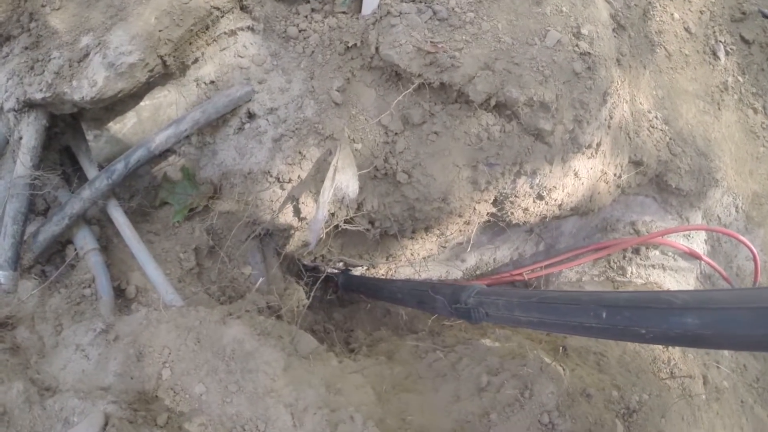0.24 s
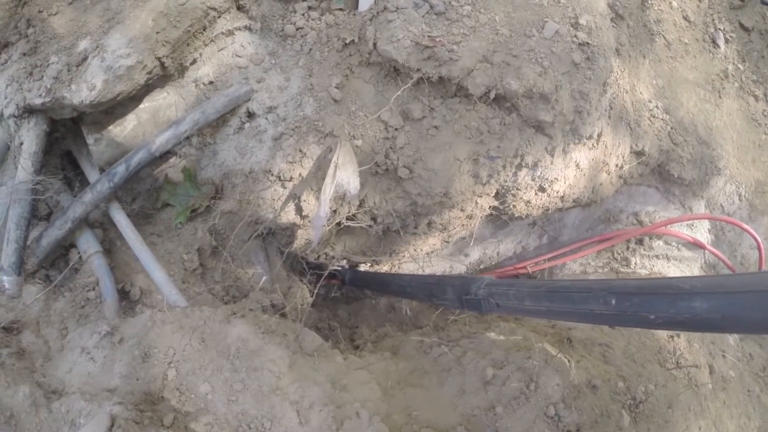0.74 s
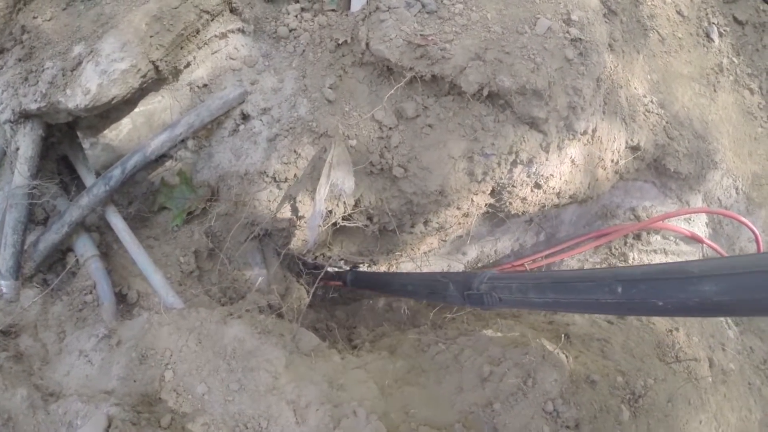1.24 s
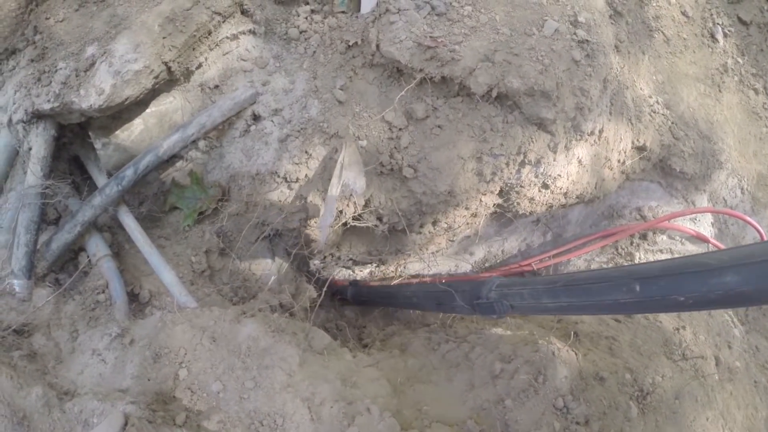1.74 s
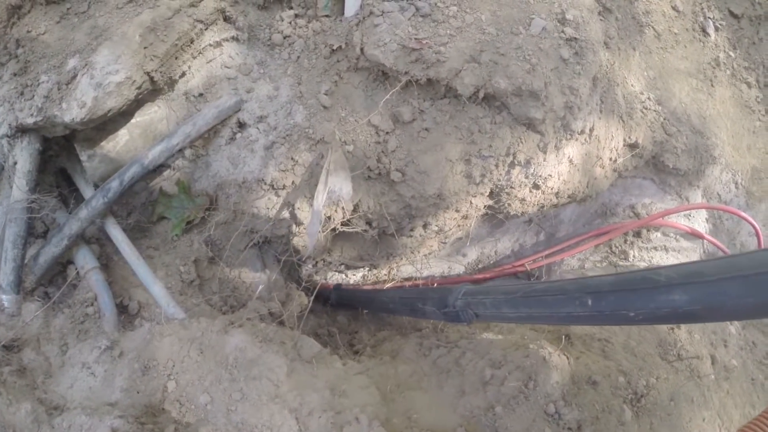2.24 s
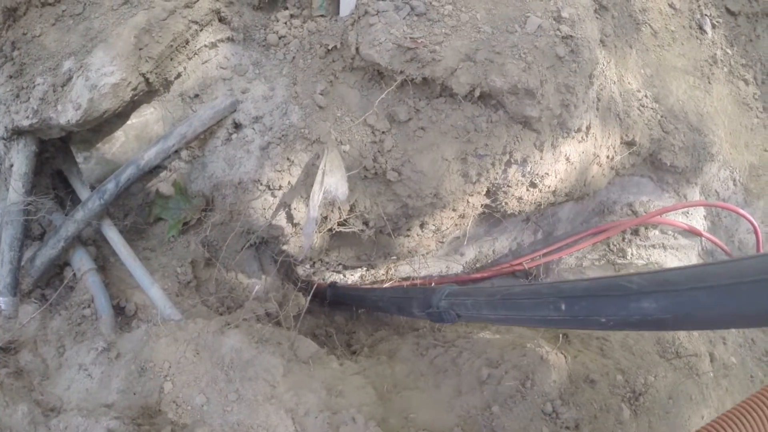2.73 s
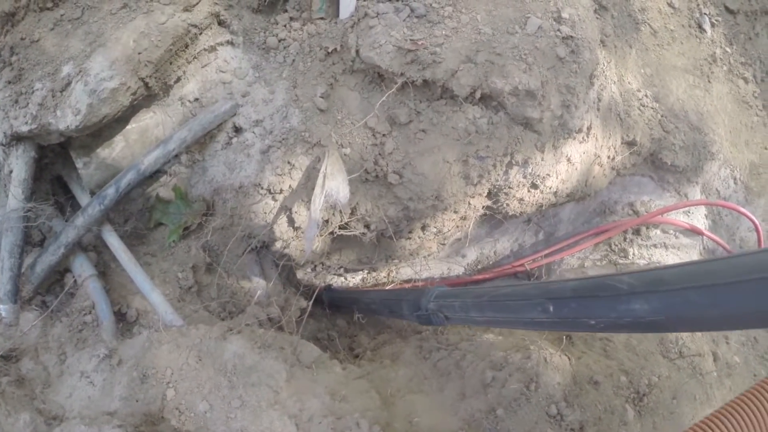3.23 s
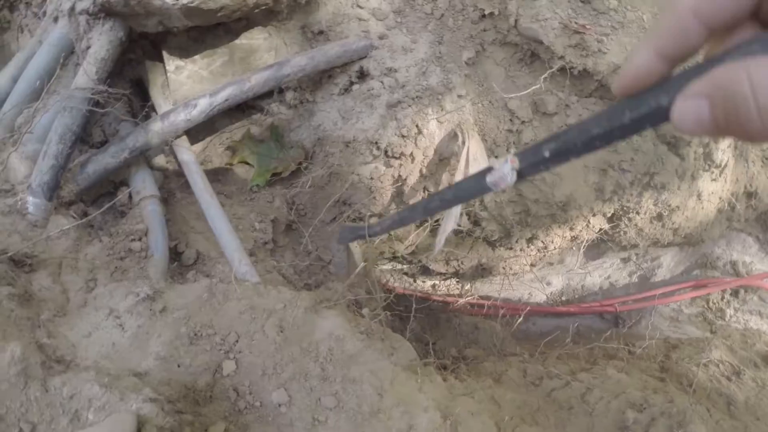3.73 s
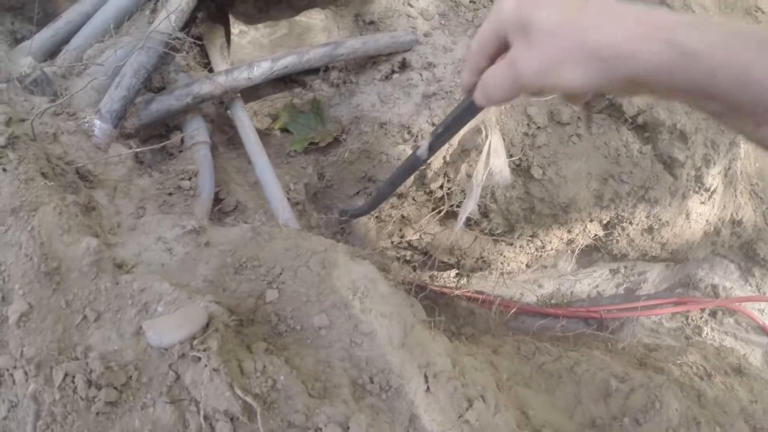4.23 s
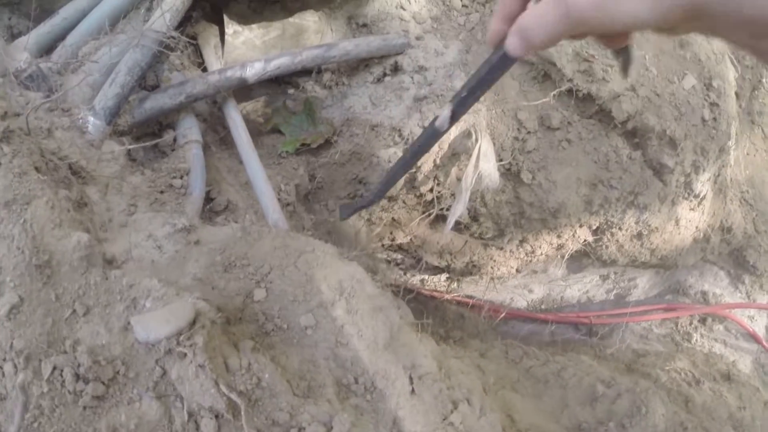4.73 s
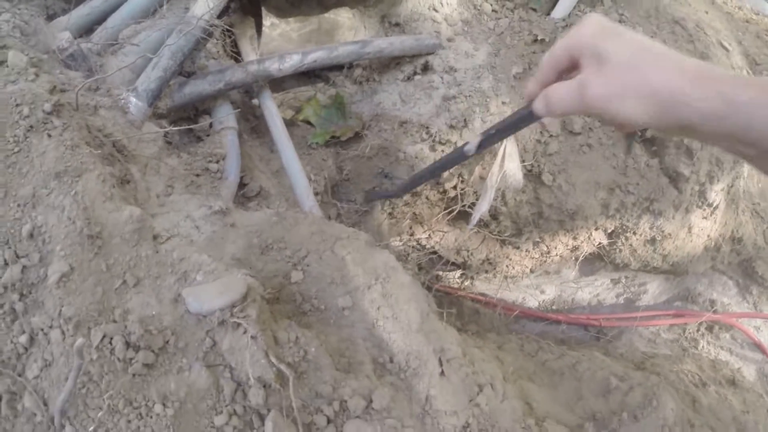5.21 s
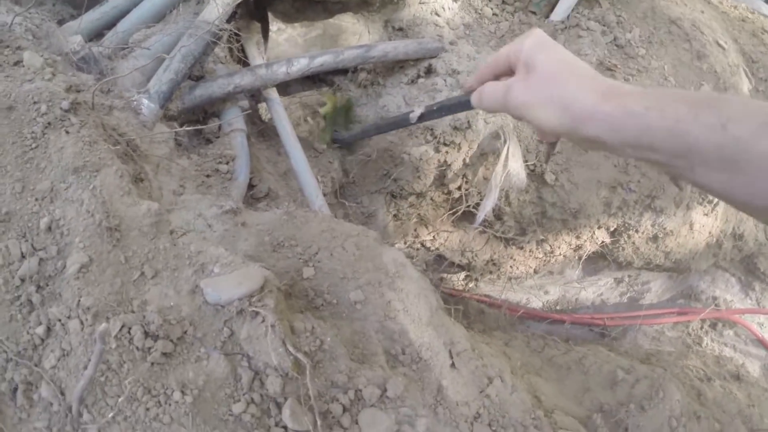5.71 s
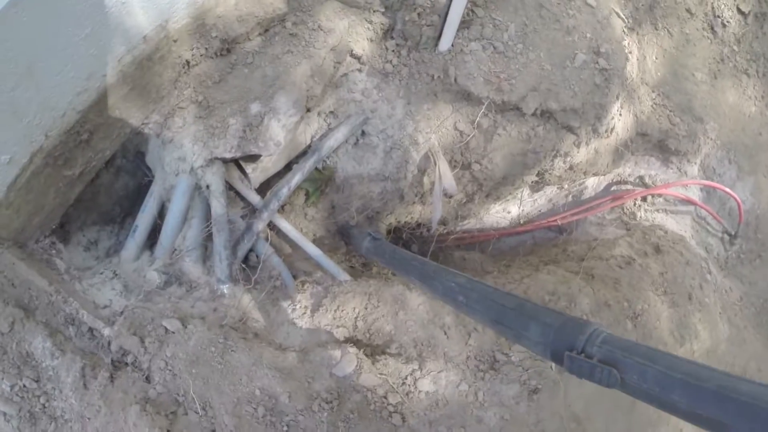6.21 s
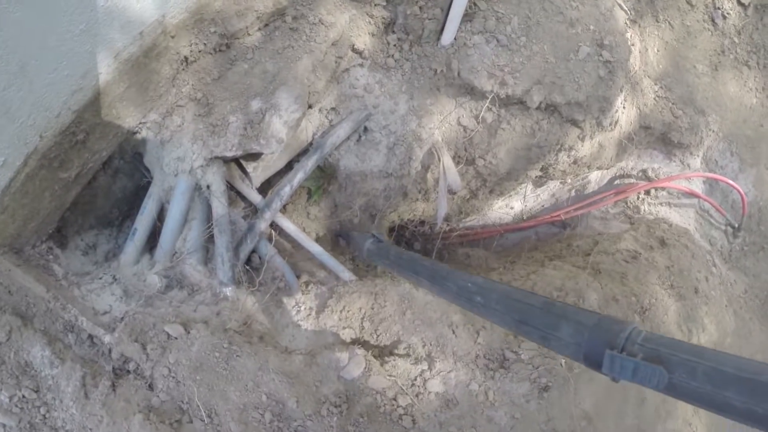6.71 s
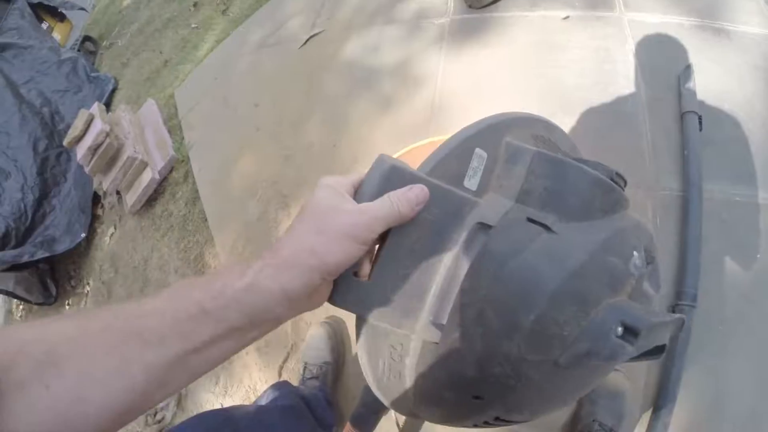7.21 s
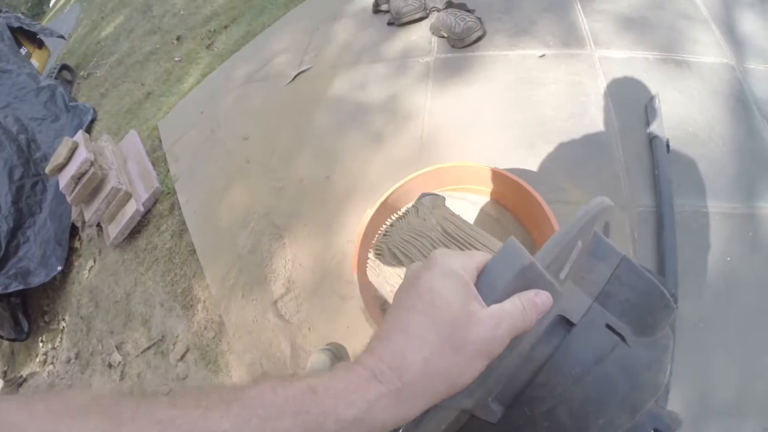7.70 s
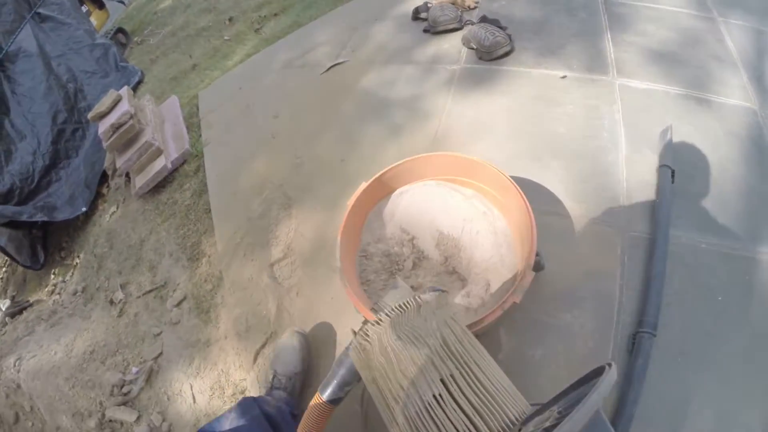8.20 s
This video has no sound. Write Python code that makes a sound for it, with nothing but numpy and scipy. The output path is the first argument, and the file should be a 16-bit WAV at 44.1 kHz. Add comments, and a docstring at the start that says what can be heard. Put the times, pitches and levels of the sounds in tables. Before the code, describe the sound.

From 0 to 3.75 seconds a wet/dry vacuum runs loudly and close outdoors: a steady, slightly fluttering whine a little above 500 hertz, broad fan hiss, exhaust roar and low drum boom. Sand hisses in surges up the hose, with pebbles crackling and stones clicking on its wall; pitch creeps up near the end. A hard cut leaves the motor slightly lower, without grit, as a bar bumps and rasps soil at about 4.1, 4.55, 5.05 and 5.7. At 5.86 another cut: the motor dips and recovers, then from 6.3 strong suction and grit return with a cluster of stone knocks near 6.47, pitch rising. At 7.25 the motor stops dead by a cut. Over quiet outdoor air, plastic rubs softly, a hollow drum knock lands at 7.64, a bright scrape with a deep bump at 7.9, then more rubbing and knocks from 8.25 to 8.45.

```python
"""Beside a trench a wet/dry vacuum whines while its nozzle sucks up grit; a steel bar prods the soil in between.
Four scenes follow each other with hard cuts; in the last the motor is off and its plastic head
is lifted off the drum, knocking and scraping on the rim. The whine is a sum of fluttering sines; air,
grit, rasps and rubbing are shaped noise or noise grains; stones, thuds and knocks are decaying rings."""
import sys
import numpy as np
from scipy import signal
from scipy.fft import rfft, irfft, next_fast_len
from scipy.io import wavfile
from scipy.ndimage import uniform_filter1d, map_coordinates

SR = 44100
rng = np.random.default_rng(int(sys.argv[2]) if len(sys.argv) > 2 else 0)


def store_wav(level_fs):
    """Save 16-bit WAV to argv[1]."""
    pcm = np.round(np.clip(np.atleast_2d(level_fs), -1, 1) * 32767)
    wavfile.write(sys.argv[1], SR, pcm.T.astype(np.int16))


def how_loud(loudness_db):
    """Turn decibels into a plain amplitude multiplier (0 dB gives 1, 20 dB gives 10)."""
    steps = np.asarray(loudness_db, float) / 20
    return 10 ** steps


N = 372689

# Scene limits. Each row: start in seconds, end in seconds, fade-in in seconds (unused at start 0).
SCENES = [(0, 3.7478, .001), (3.7585, 5.850, .007), (5.861, 7.2522, .010), (7.2522, 8.46, .001)]
# Machine levels before the dips, a row for each motor scene: whine fundamental in dB rms,
# drum boom in dB at usual suction, exhaust roar in dB, fan hiss in dB before the arm's echo.
MACHINE = [(-18, -35.5, -25.5, -28.5), (-17.5, -34, -25, -28), (-16, -30.5, -24.5, -26.5)]


def unit(x):
    """Scale to rms 1."""
    return x / np.sqrt(np.mean(x ** 2) + 1e-20)


def curves(rows):
    """One value per sample for each column after the time in seconds."""
    s, *cols = np.transpose(rows)
    return [np.interp(np.arange(N) / SR, s, col) for col in cols]


def wobble(rate_hz):
    """Smooth random curve with rate_hz knots a second."""
    knots = rng.standard_normal(int(N * rate_hz / SR) + 4)
    return map_coordinates(knots, [np.arange(N) * rate_hz / SR])


def filtered(x, response):
    """x times a response of frequency in Hz, real or complex."""
    m = next_fast_len(N + 8192)
    return irfft(rfft(x, m) * response(np.fft.rfftfreq(m, 1 / SR)), m)[:N]


def coloured(x, spectrum):
    """x through (Hz, dB) points on a log frequency axis, scaled to rms 1."""
    f, db = np.transpose(spectrum)
    return unit(filtered(x, lambda hz: how_loud(np.interp(np.log(hz + 1), np.log(f), db, -120, -120))))


def turbulence(patchy_db):
    """White noise with random gain over patches of time and frequency."""
    z = signal.stft(rng.standard_normal(N), nperseg=512)[2]
    field = uniform_filter1d(rng.standard_normal(z.shape), size=6, axis=0)
    field = uniform_filter1d(field, size=10, axis=1)
    return signal.istft(z * how_loud(patchy_db * unit(field)), nperseg=512)[1][:N]


def grains(rate_hz, spread_db, life_s, bed):
    """Short decaying noise bursts of very uneven size over a steady bed."""
    size = how_loud(spread_db * rng.exponential(size=N).clip(0, 3))
    hits = (rng.random(N) < rate_hz / SR) * size
    decay = signal.lfilter([1], [1, -np.exp(-1 / (life_s * SR))], hits)
    return (bed + decay) * rng.standard_normal(N)


def gate(start, end, fade_s):
    """Open for one scene: short fade in, hard cut out; no fade at start 0."""
    t = np.arange(N) / SR
    if not start:
        return 1. * (t < end)
    return np.clip((t - start) / fade_s, 0, 1) ** 2 * (t < end)


def machine_db(column):
    """One MACHINE column per sample, stepping at each end of scene."""
    ends = [row[1] for row in SCENES[:2]]
    return np.asarray(MACHINE)[np.searchsorted(ends, np.arange(N) / SR), column]


def add(track, s, sound):
    """Mix a sound in at s seconds."""
    part = track[round(s * SR):][:len(sound)]
    part += sound[:len(part)]


def swells(rows):
    """Amplitude that swells and dies after each (start in seconds, peak dB, swell ms)."""
    level, t = np.zeros(N), np.arange(SR // 2) / SR
    for s, db, swell_ms in rows:
        u = t / (swell_ms / 1000)
        add(level, s, how_loud(db) * (u * np.exp(1 - u)) ** 2)
    return level


def blows(rows, crack):
    """Each blow is a short ring with chance side modes that swells and dies; crack roughens it."""
    out, t = np.zeros(N), np.arange(SR // 8) / SR
    for s, db, hz, swell_ms in rows:
        u = t / (max(swell_ms, .3) / 1000)
        rough = 1 + crack * uniform_filter1d(rng.standard_normal(len(t)), size=5)
        side_ratios = rng.uniform(0.582, 1.843, size=3)
        side_modes = np.sin(2 * np.pi * np.outer(side_ratios, hz * t)).sum(axis=0)
        ring = np.sin(2 * np.pi * hz * t) + crack * 0.2 * side_modes
        ring += crack * 0.084 * rng.standard_normal(len(t))
        add(out, s, -how_loud(db) * (u * np.exp(1 - u)) ** 2 * rough * ring)
    return out


def whine(pitch_rows, db, orders_db):
    """The fan's tone and its overtones, each fluttering in level and phase on its own."""
    # Multiples of the pitch.
    multiples = (2, 3, 5, 7, 8, 12)
    pitch_hz, = curves(pitch_rows)
    phase = 2 * np.pi * np.cumsum(pitch_hz + 0.62 * wobble(25)) / SR
    tone = how_loud(0.067 * wobble(40)) * np.sin(phase)
    for k, order_db in zip(multiples, orders_db):
        level = how_loud(order_db + 1.4 * wobble(30))
        tone += level * np.sin(k * phase + .08 * k * wobble(40))
    return np.sqrt(2) * how_loud(db) * tone


def motor():
    """Whine of each motor scene; fan speed rises as the nozzle chokes."""
    # Fan tone, one list a scene. Each row: time in seconds, pitch in Hz.
    pitch_hz = [
        [(.1, 536.4), (.5, 537.2), (.9, 539.2), (1.3, 537.5), (2.1, 536.6), (2.7, 538.5), (3.1, 542),
         (3.3, 545.4), (3.6, 547)],
        [(3.8, 526.0), (5.8, 525.8)],
        [(5.9, 526.4), (6.3, 526.7), (6.5, 529.7), (6.7, 532.4), (7.2, 535)],
    ]
    # Overtones. Each row, one a scene: dB re the fundamental for multiples 2, 3, 5, 7, 8, 12.
    orders_db = [(-16, -36, -45, -42, -45, -45), (-12, -19, -32, -31, -36, -32),
                 (-24, -30, -45, -34, -45, -45)]
    return sum(gate(*span) * whine(pitch, levels[0], orders)
               for span, pitch, levels, orders in zip(SCENES, pitch_hz, MACHINE, orders_db))


def nozzle_db():
    """Level of the air tearing in at the nozzle."""
    # Each row: time in seconds, level in dB before its flutter, added grit and the dips.
    nozzle_rows = [(0, -31.5), (.7, -30.5), (1.4, -32), (2, -31), (2.5, -27.5), (3.1, -30), (3.75, -34.5),
                   (3.76, -43), (4.5, -41.5), (5.85, -41.5), (5.87, -42), (6.12, -40), (6.3, -29.5),
                   (6.5, -27), (7.25, -27)]
    return curves(nozzle_rows)[0]


def harder_db():
    """Nozzle level over the usual suction of -32 dB."""
    return nozzle_db() + 32


def sucked_grit():
    """Pebbles, sand and rare sharp flakes in the hose: noise grains, sand and flakes surging in loads."""
    # Pebble spectrum. Each row: Hz, relative dB per Hz.
    grit_spectrum = [(700, 9), (1300, 14), (2500, 8.5), (3500, -2), (6000, -23), (12000, -63)]
    # Sand spectrum. Each row: Hz, relative dB per Hz.
    sand_spectrum = [(2000, -51), (3200, 9.5), (5000, 7.5), (7500, -1), (10000, -12), (14000, -33),
                     (16500, -81)]
    # Flake spectrum. Each row: Hz, relative dB per Hz.
    chip_spectrum = [(5000, -30), (7500, -0.5), (9500, -1), (12000, -8), (15000, -22), (16500, -60)]
    # Loads of sand rushing up. Each row: start in seconds, peak in dB re the steady stream, swell in ms.
    loads = [(.07, -3, 50), (.72, -4, 70), (1.12, -4, 70), (2.27, -1, 80), (2.62, -2, 90), (2.86, 0, 80),
             (6.33, -1, 80), (6.77, -1, 70), (7.04, -3, 60)]
    stream = how_loud(1.5 * wobble(9)) + swells(loads)
    sand = coloured(grains(450, spread_db=3, life_s=.0012, bed=0), sand_spectrum)
    chips = coloured(grains(25, spread_db=3, life_s=.0015, bed=0), chip_spectrum)
    pebbles = coloured(grains(220, spread_db=2.5, life_s=.001, bed=0), grit_spectrum)
    return stream * (how_loud(-5.5) * sand + how_loud(-21) * chips) + how_loud(-3 + 0.47 * wobble(8)) * pebbles


def suction():
    """Air tearing in at the nozzle is patchy noise; grit joins it except while the bar works."""
    # Each row: Hz, relative dB per Hz.
    rush_spectrum = [(700, -9), (1300, 7), (1700, -7), (2200, 1.5), (3000, -12), (5000, -1.5), (7000, -8.5),
                     (9000, -17), (12000, -23.5), (15000, -34), (16500, -70)]
    rush = how_loud(0.33 * wobble(20)) * coloured(turbulence(patchy_db=-2.0), rush_spectrum)
    digging = 1 - gate(*SCENES[1])
    return how_loud(nozzle_db() + 1.3 * wobble(12)) * (rush + digging * sucked_grit())


def off_arm(x):
    """Add the treble's echo off the moving arm in scene two, 5.5 cycles late at the notch it sweeps."""
    # Each row: time in seconds, notch in Hz.
    arm_rows = [(3.76, 7300), (3.92, 7600), (4.05, 7150), (4.28, 7000), (4.53, 7700), (4.7, 7250),
                (5.02, 8100), (5.25, 7300), (5.6, 7000), (5.85, 7400)]
    notch_hz, = curves(arm_rows)
    treble = filtered(x, lambda hz: 1 / (1 + (6000 / (hz + 1)) ** 12) / (1 + (hz / 9300) ** 12))
    echo = map_coordinates(treble, [np.arange(N) - 5.5 * SR / notch_hz])
    return x + how_loud(-4.5) * gate(*SCENES[1]) * echo


def hiss():
    """Fan turbulence through the housing's resonances, then each scene's path to the microphone."""
    # Housing resonances. Each row: centre in Hz, width in Hz, relative gain in dB.
    modes = [(2000, 220, 1.5), (2324, 250, -0.5), (3604, 530, -1.5), (3855, 110, -1.5), (4177, 90, 1.5),
             (4883, 170, 0), (5420, 250, 1.5), (5870, 36, -0.5), (5900, 240, -34), (6430, 121, 4),
             (7020, 860, -6), (7190, 187, 0.5), (8060, 5600, -18), (9070, 160, -14), (10100, 420, -40),
             (10940, 170, -9), (13000, 3000, -55)]
    # Paths, one list a scene. Each row: Hz, relative gain in dB.
    paths = [
        [(1200, -21), (1900, 2), (4200, -6), (6500, 0), (9000, -6), (9600, -7.5), (10900, -20), (11800, -15),
         (16000, -25)],
        [(1200, -35), (1900, 3), (4200, 1), (6500, 2.5), (9000, 1.5), (9600, -11), (10900, -6), (11800, -13),
         (16000, -22)],
        [(1200, -20), (1900, 9), (4200, -5.5), (6500, 5.5), (9000, -2.5), (9600, -3), (10900, -6), (11800, -3),
         (16000, -17)],
    ]

    def housing(f):
        total = 0
        for k, (centre_hz, width_hz, db) in enumerate(modes):
            damping = 1j * f * width_hz
            total = total + (-1) ** k * how_loud(db) * damping / (centre_hz ** 2 - f * f + damping)
        return total

    fan = filtered(turbulence(patchy_db=1.5), housing)
    heard = sum(gate(*span) * coloured(fan, path) for span, path in zip(SCENES, paths))
    return how_loud(machine_db(3) + 0.3 * wobble(11)) * off_arm(heard)


def roar():
    """Exhaust roar: patchy noise wavering slowly."""
    # Each row: Hz, relative dB per Hz.
    roar_spectrum = [(300, -44), (450, -8), (620, -3), (900, 4), (1150, 0.5), (1280, -5.5), (1450, -5),
                     (1750, -19), (2200, -44)]
    return how_loud(machine_db(2) + 0.3 * wobble(7.6)) * coloured(turbulence(patchy_db=1.5), roar_spectrum)


def boom():
    """Boom of the drum: low noise, falling 0.46 dB for each dB at the nozzle."""
    # Each row: Hz, relative dB per Hz.
    boom_spectrum = [(150, -41), (210, -7), (240, -1), (300, -4.5), (358, -2.5), (400, -2), (480, -11),
                     (600, -33), (800, -60)]
    level_db = machine_db(1) - 0.46 * harder_db() + 1.04 * wobble(12)
    return how_loud(level_db) * coloured(turbulence(patchy_db=0.5), boom_spectrum)


def stones():
    """Stones strike the hose wall: cracked short rings, heard mostly in the middle range."""
    # Each row: start in seconds, nominal peak in dB before the filter, ring in Hz, swell in ms (0.3 at least).
    stone_rows = [(.023, -13, 3500, .39), (.100, -8, 4440, 0.78), (.132, -6.5, 4430, 0.57),
                  (.327, -17, 2160, 0.99), (.691, -6, 3180, 0.34), (.827, -10.5, 5000, .69),
                  (.858, -13.5, 3070, 0.7), (1.019, -13.5, 2000, 1.3), (1.163, -15, 5460, .8),
                  (1.2326, -9.5, 2110, 0.76), (1.709, -14, 2270, 1), (1.861, -18, 9500, 1),
                  (2.336, -12, 3830, 0.49), (2.35, -18, 3700, 1.1), (2.406, -10, 2150, .93),
                  (2.519, -14, 5330, 0.8), (2.748, -13.5, 2400, .7), (2.909, -6, 2080, 0.49),
                  (2.959, -7.5, 2380, 0.88), (2.9635, -14.5, 3050, 2.9), (3.7015, -14, 1610, .57),
                  (6.3674, -16, 2950, 0.18), (6.450, -13, 1900, 1.8), (6.4665, -8, 1150, 1.4),
                  (6.4762, -5.5, 1220, 1.1), (6.504, -12, 2040, 1.4), (6.59, -14.5, 1690, 1.1),
                  (6.651, -18, 2000, 1.1), (6.704, -9, 2050, 1.3), (6.734, -13, 2740, 0.68),
                  (6.880, -12.5, 3580, 2), (7.133, -22, 3970, .7)]
    # softened lows and treble
    middle = lambda hz: 1 / (1 + (hz / 8500) ** 4) / (1 + (800 / (hz + 1)) ** 4)
    return filtered(blows(stone_rows, crack=1.19), middle)


def thuds():
    """The bar (and once the nozzle) bumps the soil: nearly smooth short rings."""
    # Each row: start in seconds, nominal peak in dB, ring in Hz, swell in ms.
    thud_rows = [(3.715, -15, 121, 7), (4.105, -8.5, 1040, 2.2), (4.115, -26, 137, 12),
                 (4.5565, -1, 566, 1.3), (4.559, -26.5, 140, 8), (5.04, -31, 111, 8.9),
                 (5.706, -14, 3520, 3.1), (5.706, -28, 111, 8.9)]
    return blows(thud_rows, crack=0.078)


def rasps():
    """The bar rasps through grit: short swells of broad scraping noise."""
    # Each row: start in seconds, peak in dB, swell in ms.
    rasp_rows = [(4.1, -25.5, 8.7), (4.53, -30, 14), (5.703, -17, 4.8), (5.717, -24, 4.3)]
    # Each row: Hz, relative dB per Hz.
    rasp_spectrum = [(800, -15), (2000, 11), (3500, 3), (7000, 4), (9000, -12), (12000, -14), (15500, -36)]
    return swells(rasp_rows) * coloured(rng.standard_normal(N), rasp_spectrum)


def rubbing():
    """Plastic slips on plastic in fine grains; each stroke rises, holds and lets go."""
    # Dull slips. Each row: Hz, relative dB per Hz.
    dull_spectrum = [(200, -2.5), (400, -7), (750, -4.5), (1000, -1), (1400, -15), (2200, -29), (5000, -30),
                     (10000, -44), (16000, -65)]
    # Bright slips. Each row: Hz, relative dB per Hz.
    bright_spectrum = [(400, -38), (1000, -13), (1700, -0.5), (2150, 8.5), (2600, -0.5), (3200, 1),
                       (4500, -13.5), (7000, -18), (11000, -36), (16000, -60)]
    # Head shifting lightly in the hands between strokes. Each row: time in seconds, level in dB.
    touch_rows = [(7.26, -69), (7.42, -55), (7.5, -50), (7.83, -51.5), (7.89, -64), (8.0, -53), (8.25, -49),
                  (8.45, -44)]
    # Strokes on the rim. Each row: start in seconds, rise in seconds, hold in seconds, level in dB,
    # brightness 0-1.
    strokes = [(7.435, 0.03, .005, -50, .17), (7.559, 0.051, .01, -45, 0), (7.635, .006, .04, -41, 0),
               (7.756, 0.042, 0.013, -44, .6), (7.896, 0.0037, 0.0071, -28, 1),
               (7.897, 0.0056, 0.065, -25.5, 0.84), (8.254, 0.0067, .004, -32.5, 0.4),
               (8.226, 0.067, 0.055, -41, 0.16), (8.306, .05, .02, -33.5, .45),
               (8.369, 0.011, 0.029, -29.5, .5), (8.426, .01, .01, -46, 0.7)]
    rise_db, release_db_per_s = 23, 1200
    t = np.arange(N) / SR
    slips = grains(600, spread_db=3, life_s=.001, bed=2.8)
    dull, sharp = coloured(slips, dull_spectrum), coloured(slips, bright_spectrum)

    def mix(bright):
        bright = np.clip(bright, 0, 1)
        return (1 - bright) * dull + bright * sharp

    out = how_loud(curves(touch_rows)[0]) * mix(0.28)
    for s, rise_s, hold_s, db, bright in strokes:
        short_db = rise_db * np.clip(1 - (t - s) / rise_s, 0, 5)
        short_db += release_db_per_s * np.clip(t - s - rise_s - hold_s, 0, .1)
        out += how_loud(db - short_db) * mix(bright)
    return out


def knocks():
    """Each knock rings the drum; a fuller blow wakes its deep mode, which takes a few cycles to build."""
    # Each row: start in seconds, level in dB before 5.5 dB of gain, share of the deep mode 0-1.
    knock_rows = [(7.4835, -29, 0.4), (7.615, -37, 0), (7.644, -10.5, 0.55), (7.674, -23, 0.4),
                  (7.684, -32, 0.2), (7.898, -23.5, 1), (8.2585, -28.5, 0), (8.381, -18.5, 0.1),
                  (8.391, -29, 0.2), (8.403, -34, 0.3)]
    # Drum modes, deepest first. Each row: Hz, relative dB before a random spread, t60 in seconds.
    drum_modes = [(313, 5.5, 0.047), (700, -4.5, 0.036), (995, 3.5, 0.025), (1250, -14, 0.04),
                  (1670, -13, .02), (2000, -22, .02), (3300, -24, .015)]
    out, t = np.zeros(N), np.arange(SR // 5) / SR
    for s, db, deep in knock_rows:
        rings = []
        for hz, level_db, t60_s in drum_modes:
            decay = how_loud(level_db + 1.5 * rng.normal() - 60 * t / t60_s)
            build = (1 - np.exp(-t * hz / 2.2)) ** 2
            rings.append(decay * build * np.sin(2 * np.pi * hz * t))
        deep = np.clip(deep, 0, 1)
        add(out, s, how_loud(db + 5.5) * (deep * rings[0] + (1 - deep) * sum(rings[1:])))
    return out


def wind():
    """Buffeting on the microphone: low noise, 0.77 dB up for each dB at the nozzle, plus puffs."""
    # Each row: Hz, relative dB per Hz.
    buffet_spectrum = [(15, -37), (35, -13), (80, -2.5), (130, -2.5), (200, -5), (320, -30)]
    # Puffs. Each row: start in seconds, peak in dB, swell in ms.
    gusts = [(.07, -44, 22), (.31, -35, 25), (.46, -40, 34), (.95, -42, 22), (1.57, -40, 22),
             (2.04, -36, 36), (2.44, -38, 23), (2.57, -36, 100), (2.96, -28, 46), (3.17, -32.5, 62),
             (3.52, -33, 8.3), (3.69, -35, 39), (4.1, -39, 20), (4.54, -31, 15), (5.03, -31, 18),
             (5.69, -31, 25), (6.22, -34, 54), (6.65, -38, 30), (6.97, -38, 24)]
    level = how_loud(-38.5 + 0.77 * harder_db() + 0.99 * wobble(10)) + swells(gusts)
    return level * coloured(rng.standard_normal(N), buffet_spectrum)


def rumble():
    """Steady low shudder of the ground: shaped noise."""
    # Each row: Hz, relative dB per Hz.
    rumble_spectrum = [(12, -20), (22, 0), (40, -8), (70, -17), (100, -50)]
    return how_loud(-50.5) * coloured(rng.standard_normal(N), rumble_spectrum)


def outdoors():
    """Outdoor background: patchy noise, mostly low."""
    # Each row: Hz, relative dB per Hz.
    outdoor_spectrum = [(15, -37.5), (25, 2.5), (91, -4.5), (168, -4.5), (485, -19), (802, -20), (966, -20),
                        (1640, -26), (2190, -28), (4990, -32.5), (14000, -49)]
    return how_loud(-48.5) * coloured(turbulence(patchy_db=1.2), outdoor_spectrum)


def dips():
    """Gain that falls quickly at set moments and returns exponentially within the same scene."""
    # Each row: deepest moment in seconds, depth in dB, recovery time constant in seconds.
    dip_rows = [(.11, 2.5, 0.094), (3.76, 0.8, 0.21), (4.565, 3, 0.21), (5.861, 9, 0.36), (6.47, 4.5, 0.52)]
    fall_s = 0.014
    t = np.arange(N) / SR
    down_db = np.zeros(N)
    for s, db, back_s in dip_rows:
        for start, end, _ in SCENES:
            if start <= s + fall_s < end:
                fall = np.clip((t - s) / fall_s + 1, 0, 1)
                back = np.exp(-np.clip(t - s, 0, None) / back_s)
                down_db += db * fall * back * (t < end)
    return how_loud(-down_db)


def scene():
    """Three scenes with the motor on, one with it off; machine, air and rumble share the dips."""
    gates = [gate(*row) for row in SCENES]
    dip = dips()
    air = suction() + hiss() + roar() + boom() + wind()
    work = dip * (air + rumble()) + stones() + thuds() + rasps()
    lifting = rubbing() + knocks() + outdoors()
    return (dip * motor() + sum(gates[:3]) * work + gates[3] * lifting)[None]


def low_pass(x):
    """Removes everything above the highest recorded frequency."""
    return signal.sosfilt(signal.butter(12, 15750, fs=SR, output="sos"), x)


def record(dry):
    """Nothing is kept from 15.5 kHz up."""
    limited = filtered(dry[0], lambda hz: hz < 15500)[None]
    return low_pass(limited)


dry = scene()
out = record(dry)
store_wav(out)
```